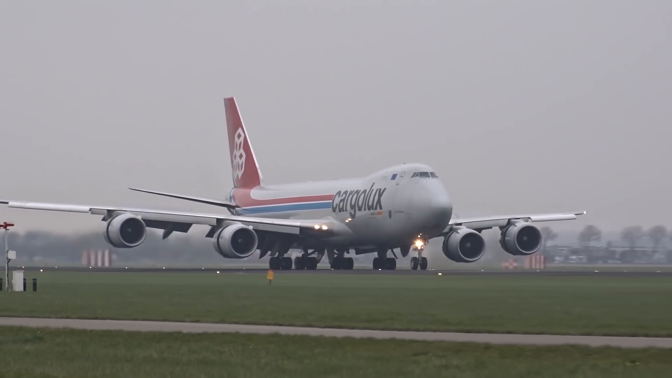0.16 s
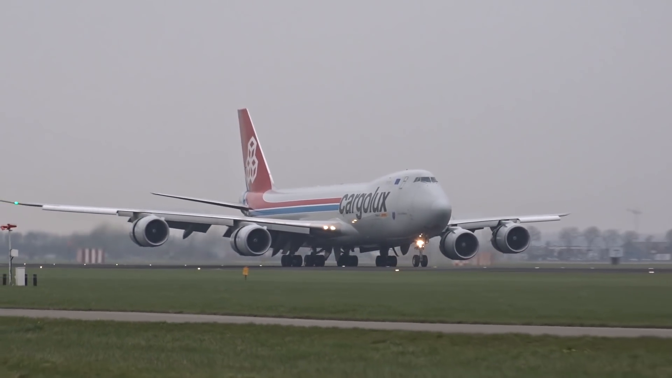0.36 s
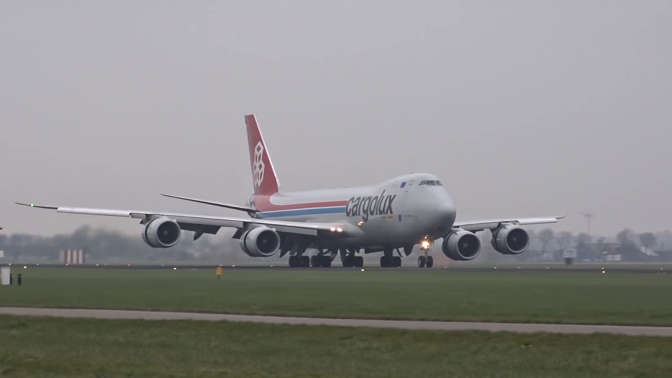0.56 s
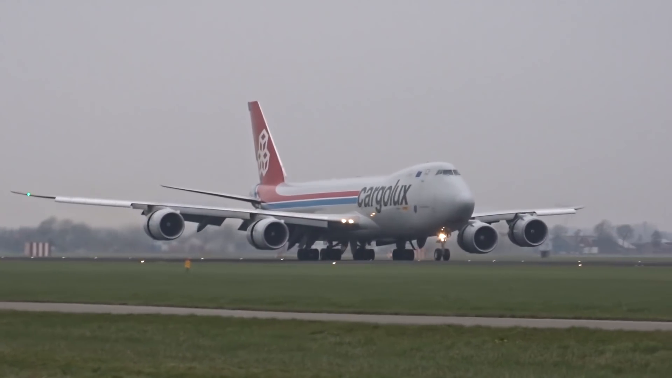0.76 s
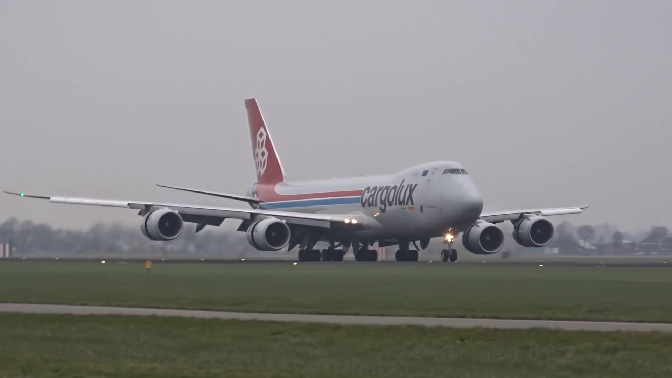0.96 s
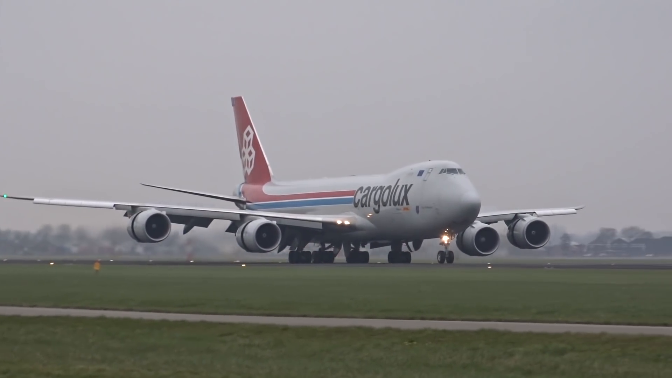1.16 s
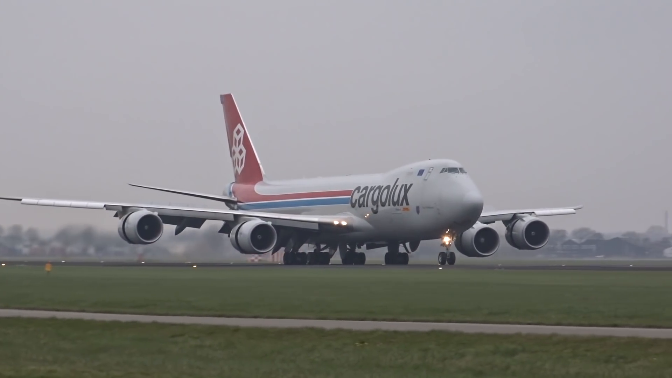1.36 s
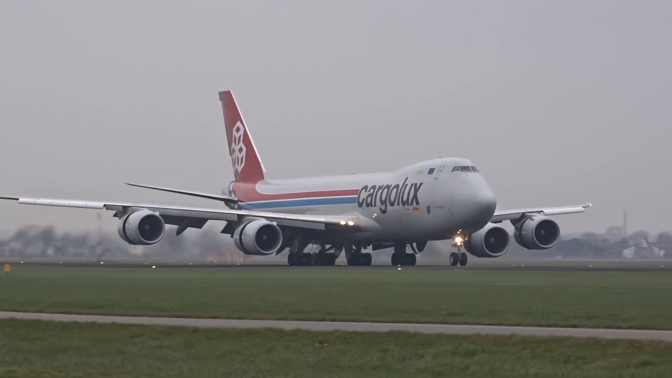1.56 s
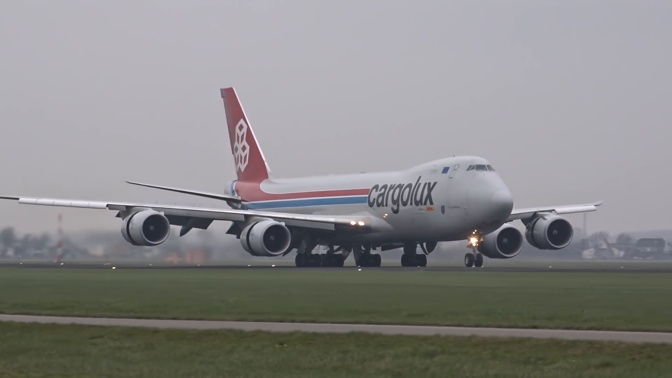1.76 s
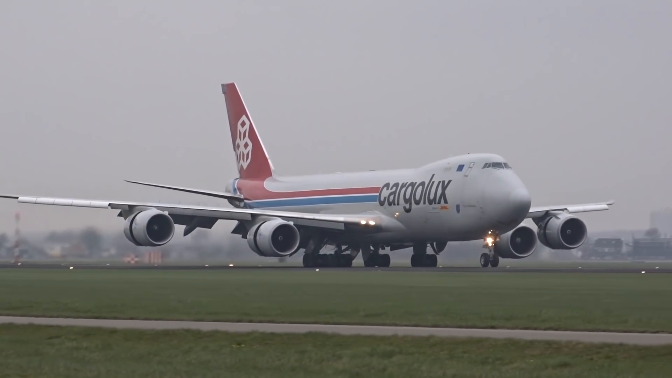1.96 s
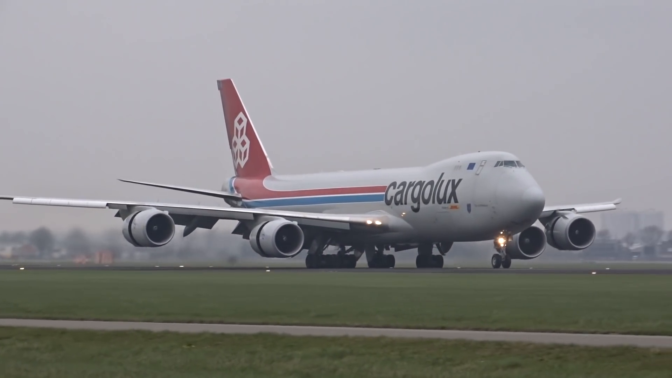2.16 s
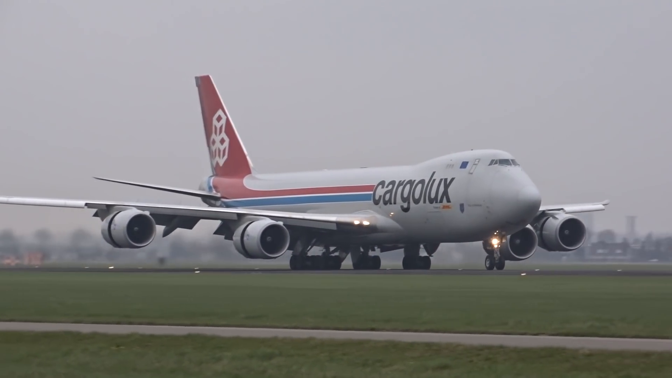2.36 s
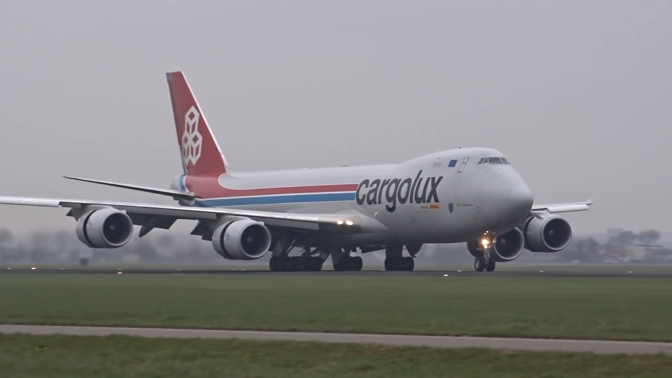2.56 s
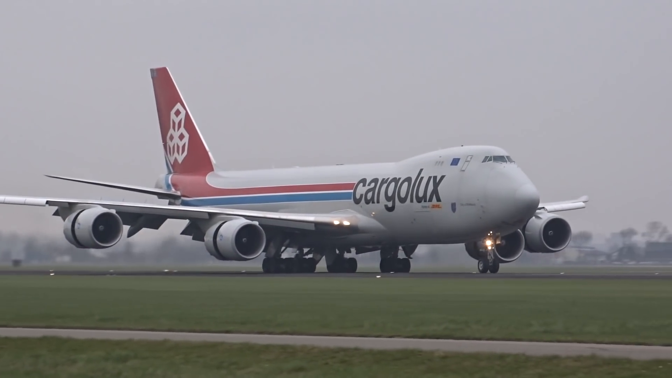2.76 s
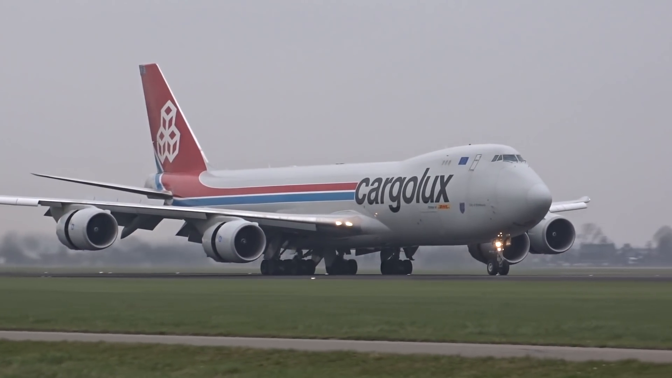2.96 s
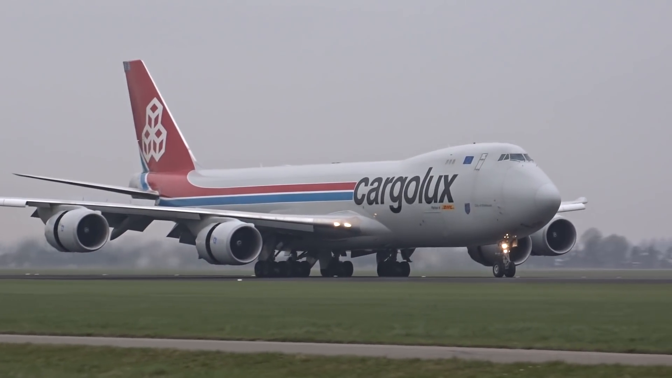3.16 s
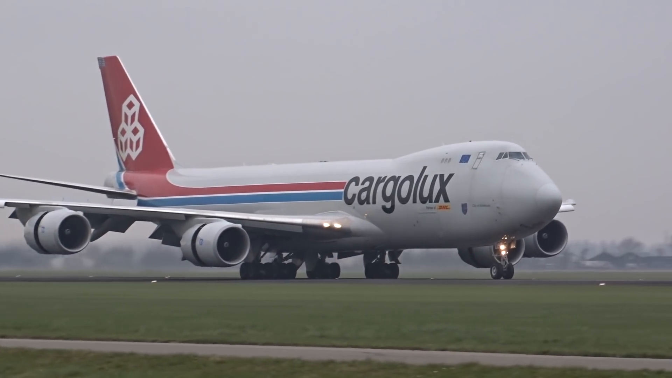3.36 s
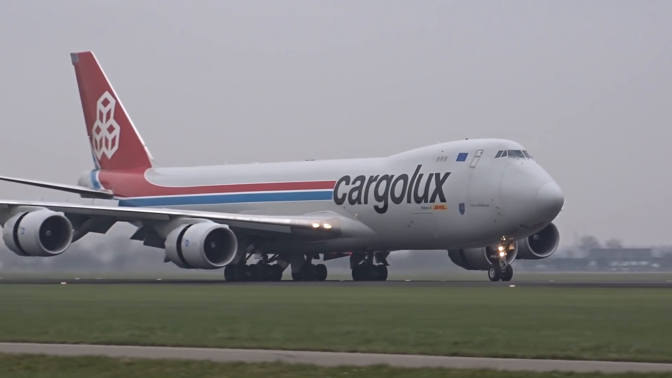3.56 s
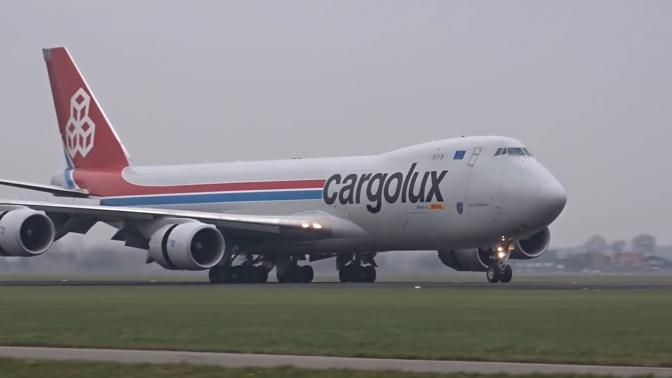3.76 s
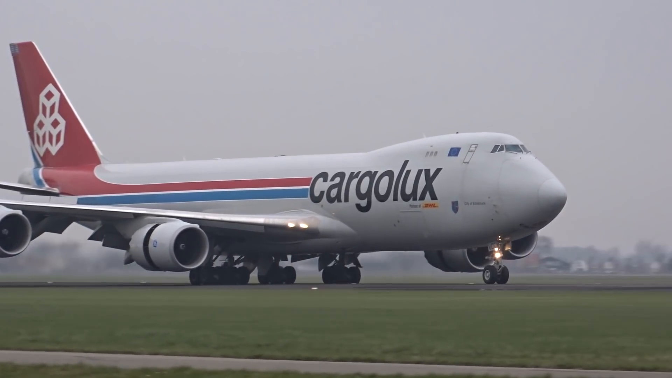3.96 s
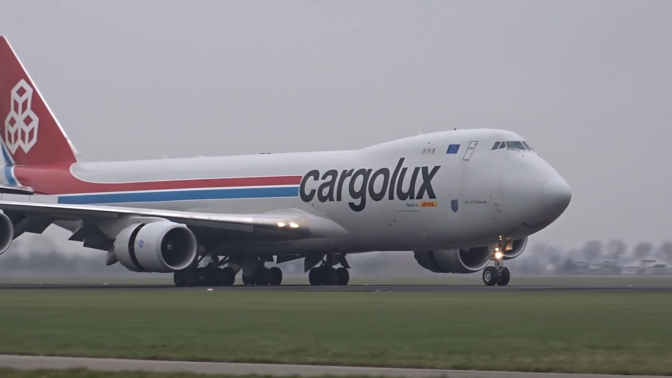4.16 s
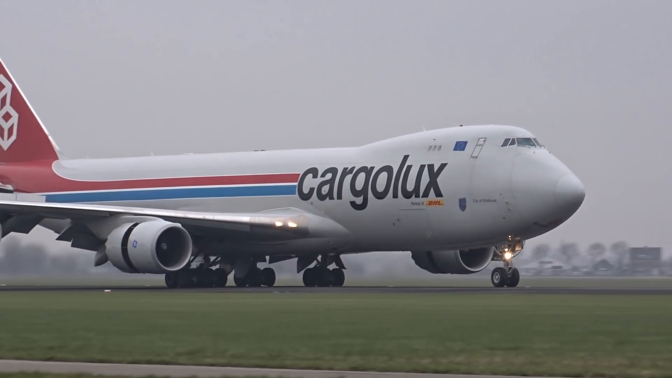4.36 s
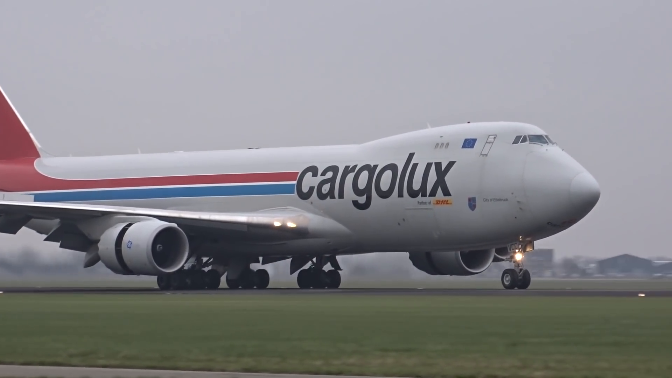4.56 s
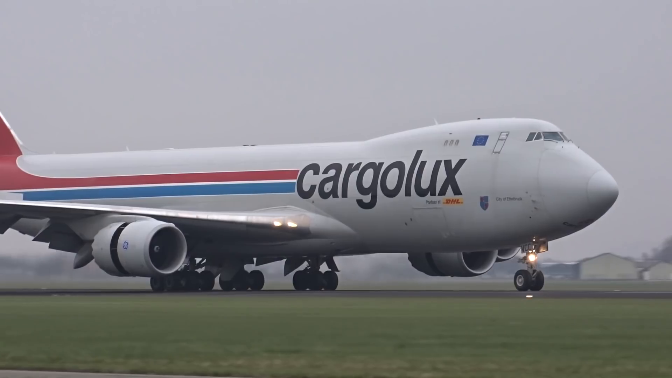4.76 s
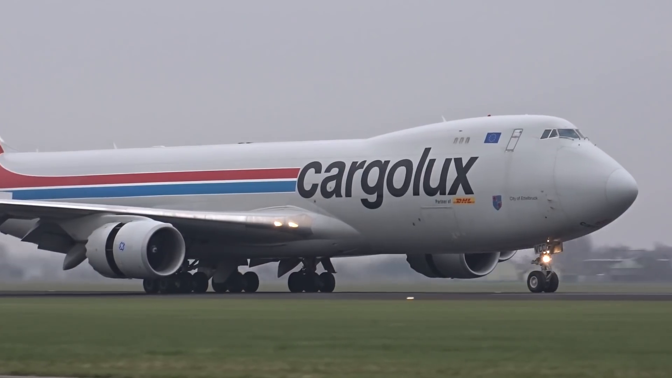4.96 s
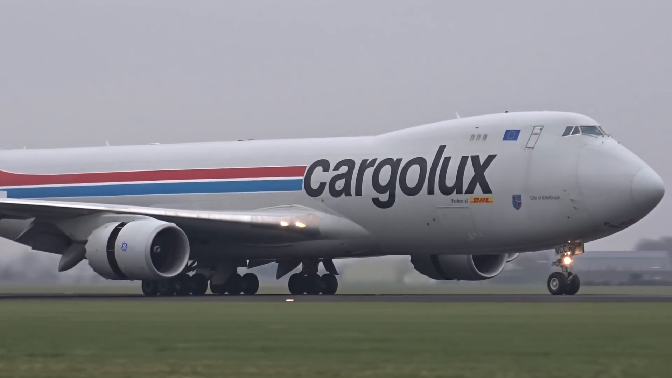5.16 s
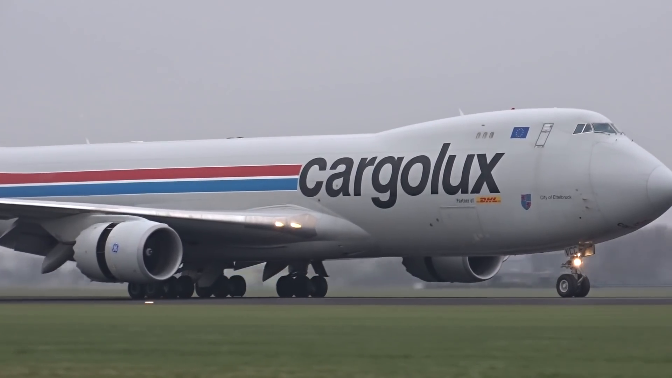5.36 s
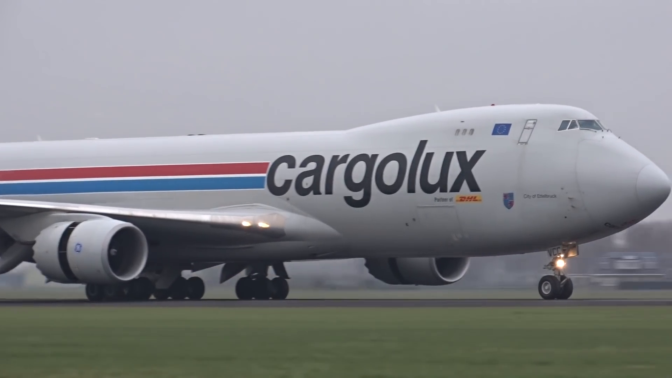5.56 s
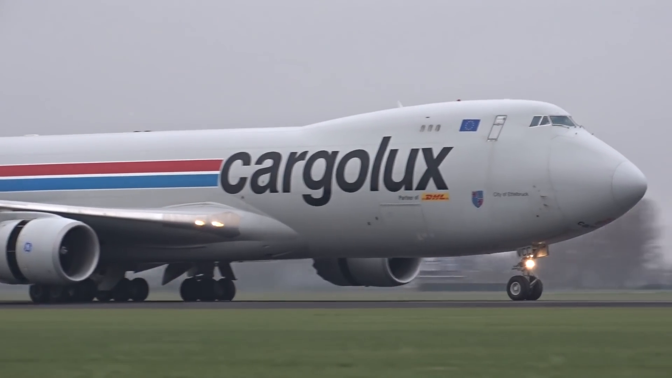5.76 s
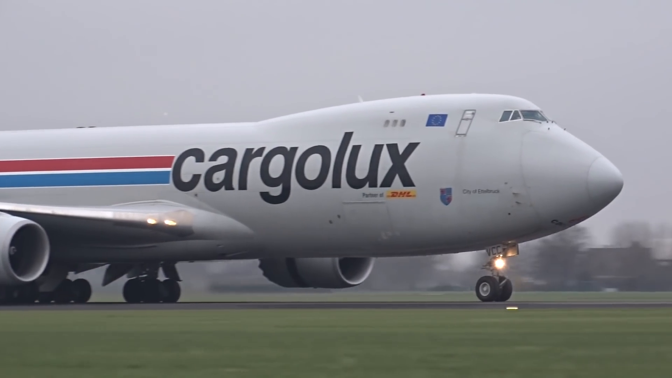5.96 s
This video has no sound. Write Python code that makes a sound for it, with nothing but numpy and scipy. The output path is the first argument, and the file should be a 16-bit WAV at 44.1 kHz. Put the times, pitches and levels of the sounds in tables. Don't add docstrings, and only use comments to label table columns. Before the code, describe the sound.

Outdoors by a runway, low jet idle with small motor ticks builds over two seconds into a heavy, broad engine roar with a blurred rising whine.

```python
import sys
import numpy as np
from scipy import signal
from scipy.io import wavfile
from scipy.ndimage import uniform_filter1d, minimum_filter1d

SR = 44100
rng = np.random.default_rng(int(sys.argv[2]) if len(sys.argv) > 2 else 0)


def volts_from_decibels(level):
    exponent = np.asarray(level, float) / 20
    return 10 ** exponent


def file_out(sig):
    cols = np.atleast_2d(sig).T
    lim = np.clip(cols, -1, 1)
    pcm = np.round(lim * 32767).astype(np.int16)
    wavfile.write(sys.argv[1], SR, pcm)


N = 265041

FRAME, HOP = 1024, 256
HZ = np.fft.rfftfreq(FRAME, 1 / SR)[:, None]
T = np.arange(N // HOP + 5) * HOP / SR
FAN_HZ = 590, 836
IDLE_DB = -38
HISS_BAND = 9500, 15500
# time_s, level_db
THRUST = [(0, -38.5), (.45, -37.5), (.8, -35), (1.05, -31), (1.4, -27), (1.95, -23), (2.5, -21.5),
          (3.0, -22), (3.55, -22), (3.85, -23), (4.2, -21.5), (4.55, -23.5), (4.7, -22.5), (4.85, -23.5),
          (5.4, -24), (5.8, -23), (6.01, -25.5)]


def thrust_db(t):
    return np.interp(t, *np.transpose(THRUST))


def ramp(x, lo, hi):
    u = np.clip((x - lo) / (hi - lo), 0, 1)
    return u * u * (3 - 2 * u)


def rollout(t=T):
    ahead_m, aside_m = 408, 170
    speed_m_per_s, braking_m_per_s2 = 59.5, 2.8
    along_m = ahead_m - speed_m_per_s * t + braking_m_per_s2 * t ** 2 / 2
    metres = np.hypot(along_m, aside_m)
    turn = aside_m / metres - aside_m / np.hypot(ahead_m, aside_m)
    spool = ramp(t, 0.45, 2.6)
    return spool, metres, turn


def evened(x):
    return x / np.sqrt(np.mean(x ** 2) + 1e-20)


def read(points):
    f, value = np.transpose(points)
    return np.interp(np.log(HZ + 1), np.log(f + 1), value)


def hump(hz, width_hz):
    return 1 / (1 + (2 * (HZ - hz) / width_hz) ** 2)


def leveled(shape_db, lo_hz, hi_hz, level_db):
    band = (HZ >= lo_hz) & (HZ < hi_hz)
    power = (volts_from_decibels(2 * shape_db) * band).sum(0) / 6
    return volts_from_decibels(shape_db + level_db) / np.sqrt(power)


def drift(frames, bins):
    field = rng.standard_normal((len(T), len(HZ))).T
    for _ in range(2):
        field = uniform_filter1d(field, frames, axis=1)
        field = uniform_filter1d(field, bins, axis=0)
    return evened(field)


def noise(size, same, lead, tilt_db):
    a, b, c, d = rng.standard_normal((len(T), len(HZ), 4)).T
    same = np.clip(same, 0, 1)
    left = (a + 1j * b) / 2
    own = (c + 1j * d) / 2
    right = same * left + np.sqrt(1 - same ** 2) * own
    turn = volts_from_decibels(tilt_db / 2) * np.exp(0.5j * lead)
    spectra = size * np.array([left * turn, right / turn])
    return signal.istft(spectra, nperseg=FRAME, noverlap=FRAME - HOP)[1][:, :N]


def exhaust_rumble():
    spool, _, turn = rollout()
    core_lead_s = 0.12 * (1 - spool)
    thrust_rise_db = thrust_db(T + core_lead_s) - IDLE_DB
    level_db = -32 + 0.6 * thrust_rise_db + 15 * turn
    hump_hz = 96 + 24.2 * spool + 59.5 * turn
    octaves = np.log2((HZ + 5) / hump_hz)
    shape_db = 6.9 * np.minimum(octaves, 0) - 6.9 * np.maximum(octaves, 0)
    ground_dip_hz = 222
    shape_db -= 46 * np.log2(1 + (HZ / ground_dip_hz) ** 10) / 10
    shape_db += 0.078 * (hump_hz - 110) * np.exp(-((octaves - 0.1) / 0.4) ** 2)
    return leveled(shape_db, 40, 260, level_db)


def fan_roar():
    # hz, level_db_per_hz
    near = [(160, -33), (280, -10), (366, -5.5), (542, -7.5), (700, -4.5), (850, -4.5), (1460, -5.5),
            (2300, -6), (3100, -7.5), (3700, -11), (4500, -14.5), (6400, -17), (8490, -31.5), (12000, -66)]
    # hz, level_db_per_hz
    idle = [(160, -43), (280, 0), (317, -9.5), (350, -18), (444, -2), (491, -7.5), (1220, -10),
            (1490, -16.5), (3100, -18), (5500, -45.5), (7150, -75.5), (12100, -120)]
    spool, metres, turn = rollout()
    roar_db = thrust_db(T)
    reverse_share = 0.91 * np.clip((roar_db - IDLE_DB) / 8, 0.06, 1)
    treble_loss_db = 0.1111 * (metres - metres[-1]) + 3 * (1 - spool)
    reverse_db = read(near) - treble_loss_db * (HZ / 5380) ** 2
    duct_hz = np.interp(spool, (0, 1), FAN_HZ)
    duct_db = 4 - 8.5 * turn - 3.5 * np.sin(np.pi * spool) ** 2
    reverse_db += duct_db * hump(duct_hz, 330) + 2.8 * hump(1900, 290)
    dip_db = 2 - 11.5 * ramp(turn, 0.22, 0.52)
    reverse_db -= dip_db * hump(360, 210) / 2
    shape_db = (1 - reverse_share) * read(idle) + reverse_share * reverse_db
    return leveled(shape_db, 500, 3000, roar_db)


def airliner():
    # hz, lead_rad
    lead_quiet = [(40, .03), (100, .1), (300, .3), (600, .54), (1200, .45), (2100, .48), (3000, .3),
                  (5800, .01)]
    # hz, lead_rad
    lead_loud = [(40, .22), (100, .56), (370, 1.07), (580, 1.05), (1100, .57), (2100, .5), (3000, .3),
                 (5800, .01)]
    # hz, level_db
    tilt = [(40, -.5), (230, .4), (450, 0), (770, 1.5), (1350, -1), (1650, -.3), (1900, -1), (2350, 1),
            (2900, .6), (3500, 1.8), (4000, 1), (4800, 1.9), (5800, 0)]
    # hz, likeness_0_to_1
    likeness = [(40, .997), (300, .983), (600, .99), (2000, .975), (4800, .965), (5800, .99)]
    spool = rollout()[0]
    scatter_db = 0.67 * drift(5, 12) + 0.68 * drift(4, 200) * np.sqrt(HZ / 5000)
    surge_db = 0.6 * drift(24, 4)
    rumble_power = exhaust_rumble() ** 2 * volts_from_decibels(2 * surge_db)
    roar_power = fan_roar() ** 2 * volts_from_decibels(2 * scatter_db)
    size = np.sqrt(rumble_power + roar_power)
    lead = read(lead_quiet) + spool * (read(lead_loud) - read(lead_quiet))
    tilt_db = read(tilt) + (HZ > 400) * (T - 3.5) * 0.2
    apart = HZ < 5800
    return noise(size, np.where(apart, read(likeness), 1), lead * apart, tilt_db * apart)


def fan_whine():
    t = np.arange(N) / SR
    spool, _, turn = rollout(t)
    hz = np.interp(spool, (0, 1), FAN_HZ)
    level_db = thrust_db(t) - 16.5 - 30 * turn ** 2 + 1.5 * spool
    line_width_hz = 13
    r = np.exp(-np.pi * line_width_hz / SR)
    flutter = signal.lfilter([1], np.convolve([1, -r], [1, -r]), rng.standard_normal((N, 4)), axis=0)
    flutter = evened(flutter) + 1.1
    port_phase = np.array([[0.38], [-0.38]])
    phase = 2 * np.pi * np.cumsum(hz) / SR + port_phase
    line = evened(flutter[:, 0] * np.cos(phase) + flutter[:, 1] * np.sin(phase))
    upper_phase = 2.22 * phase
    upper = evened(flutter[:, 2] * np.cos(upper_phase) + flutter[:, 3] * np.sin(upper_phase))
    line += volts_from_decibels(-4.5) * spool * upper
    port_db = np.array([[0.6], [-0.6]])
    return line * volts_from_decibels(level_db + port_db) * np.clip(2 * t - 1, 0, 1)


def zoom_motor():
    # start_s, stop_s, first_db, last_db
    runs = [
        (-.01, .528, -68.5, -65.5),
        (.672, .792, -62.5, -63),
    ]
    # hz, level_db_per_hz
    body = [(3000, -30), (4600, -4), (5600, -3), (6300, 1), (6900, 1), (7900, -4), (8800, -11), (9400, -9),
            (10000, -2), (11300, -5), (12200, -2), (13500, -1), (14500, -2), (15500, 0)]
    # start_s, level_db, pitch_hz, t60_s, snap_0_to_1
    ticks = [
        (.326, -38, 4200, .008, 1),
        (.677, -36, 4500, .024, .18),
        (.684, -42, 4300, .02, .3),
        (.705, -45, 6600, .008, 1),
    ]
    t = np.arange(N) / SR
    gate = np.zeros(N)
    for on, off, first_db, last_db in runs:
        coast_db = -900 * np.maximum(t - off, 0)
        gate += volts_from_decibels(np.interp(t, (on, off), (first_db, last_db)) + coast_db) * (t > on)
    gate = uniform_filter1d(gate, size=300)
    whir = leveled(read(body) + 1.5 * drift(3, 30), *HISS_BAND, 0)
    out = gate * noise(whir, 0.72, 0, 0)
    for start_s, level_db, hz, t60, snap in ticks:
        after = np.clip(t - start_s, 0, None)
        contact = snap * rng.standard_normal(N) * volts_from_decibels(-60 * after / 0.012)
        ring = np.sin(2 * np.pi * hz * after) + contact
        out += volts_from_decibels(level_db - 60 * after / t60) * ring * np.minimum(after / 0.0008, 1)
    return out


def preamp_hiss():
    # hz, level_db_per_hz
    colour = [(4410, -34.5), (7500, -5.5), (8050, -14), (8540, -6.5), (12100, -2.5), (15100, -3),
              (15700, -4.5)]
    level_db = -73 - 23 * rollout()[2] ** 2
    return noise(leveled(read(colour) + 1.8 * drift(4, 12), *HISS_BAND, level_db), 0.87, 0, 0)


def gain_control(x):
    power = (x ** 2).mean(0)
    slow = abs(uniform_filter1d(power, size=13000)) + 1e-6
    fast = slow[0] + signal.lfilter([0.003], [1, 0.003 - 1], power - slow[0])
    ridden = x * (slow / (abs(fast) + 1e-6)) ** 0.26
    peak = -minimum_filter1d(-abs(ridden).max(0), size=201)
    ceiling = 0.8
    return ridden / uniform_filter1d((1 + (peak / ceiling) ** 4) ** 0.5, size=201)


def scene():
    return airliner() + fan_whine() + zoom_motor()


def low_pass(x):
    return signal.sosfilt(signal.butter(12, 15790, fs=SR, output="sos"), x)


def record(dry):
    cut = signal.lfilter(*signal.butter(2, 39, "high", fs=SR), dry)
    mix = gain_control(cut) + preamp_hiss()
    left_s = (N - np.arange(N)) / SR
    return low_pass(mix * ramp(left_s, 0, 0.004))


dry = scene()
out = record(dry)
file_out(out)
```